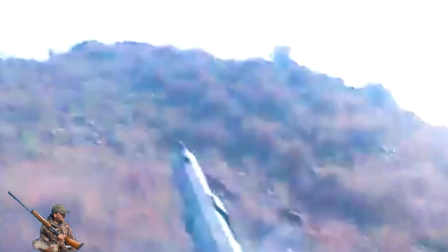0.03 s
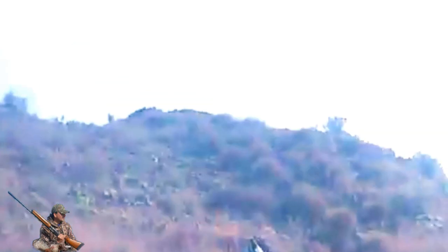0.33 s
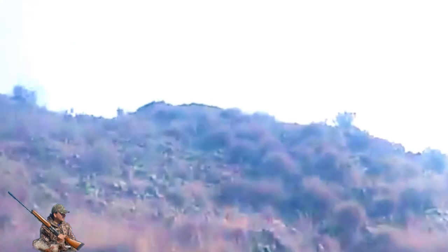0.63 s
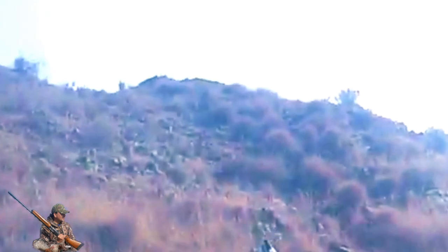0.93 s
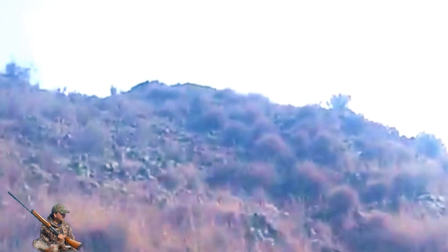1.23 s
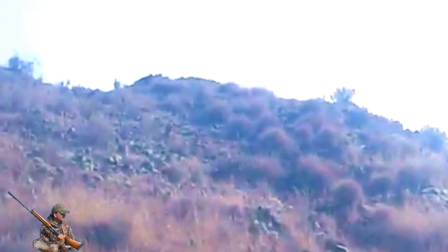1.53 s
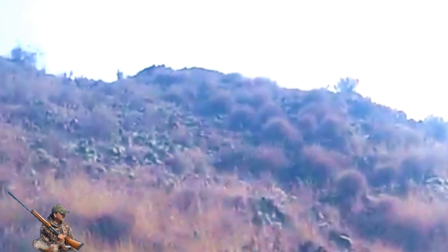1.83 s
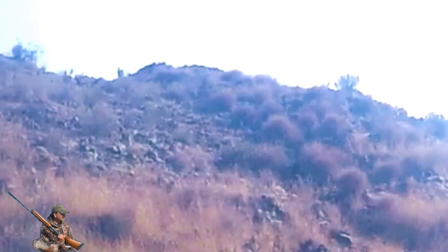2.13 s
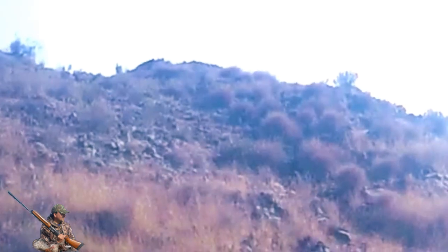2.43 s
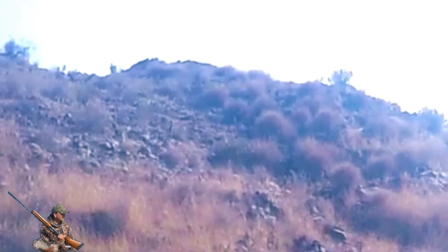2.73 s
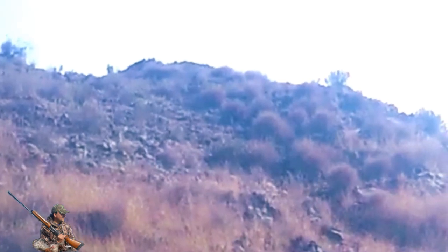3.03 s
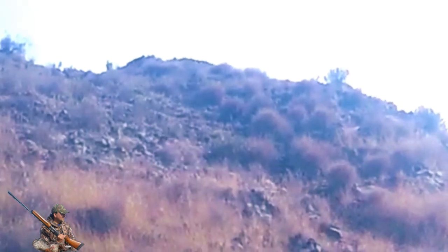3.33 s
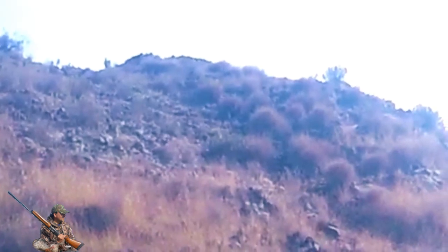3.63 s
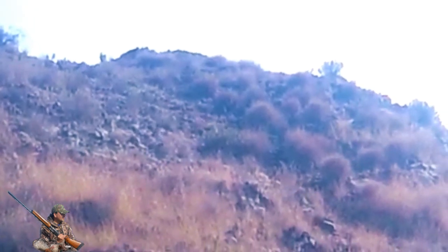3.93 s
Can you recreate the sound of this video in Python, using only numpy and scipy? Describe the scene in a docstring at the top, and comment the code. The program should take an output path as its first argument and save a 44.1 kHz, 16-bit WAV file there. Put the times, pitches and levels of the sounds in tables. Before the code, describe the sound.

A slowed-down shotgun blast booms deep and dull over a hillside, with short echoes. The gun's action clatters shut with a brief steel ring, then the rumble fades into faint wind on the microphone.

```python
"""A shotgun blast rolls over a scrubby hillside, heard in slow motion, so it is all deep and dull.
Under the roar the air pressure swings slowly, and the slopes throw back short echoes.
Half a second in, the gun's action (its moving parts) clatters shut and its steel rings.
A ridge answers last and faint wind remains. The slowed playback adds a thin whistle
that follows the wave."""
import sys
import numpy as np
from scipy import signal
from scipy.fft import rfft, irfft
from scipy.io import wavfile

SR = 44100
rng = np.random.default_rng(int(sys.argv[2]) if len(sys.argv) > 2 else 0)


def master_out(mix):
    """Clip the mix to full scale and print it as 16-bit PCM to the path in sys.argv[1]."""
    frames = np.transpose(np.atleast_2d(mix))
    ceiling = np.clip(frames, -1, 1)
    pcm = np.round(ceiling * 32767).astype(np.int16)
    wavfile.write(sys.argv[1], SR, pcm)


N = 176400
TIME = np.arange(N) / SR


def amp(db):
    """Turns decibels into a number to multiply by."""
    return 10 ** (np.asarray(db) / 20)


def unit(x):
    """Scales a signal to an average (rms) strength of 1."""
    return x / np.sqrt(np.mean(x ** 2) + 1e-30)


def at_pitch(table, hz):
    """Looks up a value between a table's rows, on a log-frequency scale."""
    row_hz, value = np.transpose(table)
    return np.interp(np.log(hz + 1), np.log(row_hz + 1), value)


def noise(tone):
    """Steady noise of strength 1; the table sets how its lows and highs balance."""
    gain = amp(at_pitch(tone, np.fft.rfftfreq(N, 1 / SR)))
    return unit(irfft(rfft(rng.standard_normal(N)) * gain, N))


def wander(hz):
    """A smooth random wobble, up to about the given rate."""
    gain = np.exp(-(np.fft.rfftfreq(N, 1 / SR) / hz) ** 2)
    return unit(irfft(rfft(rng.standard_normal(N)) * gain, N))


def strike(start_s, fade_s, rise_s=0.0022):
    """The loudness of one hit: it rises fast, then drops to 37% every fade_s."""
    age = np.maximum(TIME - start_s, 0)
    return np.minimum(age / rise_s, 1) * np.exp(-np.maximum(age - rise_s, 0) / fade_s)


def low_pass(x, hz):
    """Cuts away everything above the given frequency."""
    taps = signal.firwin(2401, hz, window=("kaiser", 9), fs=SR)
    padded = np.pad(x, len(taps) // 2, "reflect", reflect_type="odd")
    return signal.fftconvolve(padded, taps, "valid")


# tone of the roar (frequency [Hz], relative level [dB])
BLAST_TONE = [(4, -10.5), (12, -15.5), (26, 11), (45, -4), (80, -16), (125, -12.5), (180, -8.5), (220, -11),
              (285, -21), (340, -13.5), (390, -21), (458, -8.5), (495, -15.5), (540, -22.5), (590, -24),
              (730, -31.5), (900, -32), (1070, -36), (1450, -37.5), (1850, -45)]
# how fast each pitch dies; below 1 it lingers (frequency [Hz], share of the fall [ratio])
BLAST_FALL = [(10, 1.0), (30, 0.93), (150, 1), (460, 0.94), (900, 0.91), (1850, 1)]
BLAST_DB, BLAST_HOLD_S, BLAST_KNEE_S = -30.5, 0.088, 0.47
BLAST_END_S = 2.74  # the farthest slopes have answered by then


def blast():
    """The hillside scatters the shot into a lumpy roar that holds briefly, dies down and runs out."""
    hz, t, spectrum = signal.stft(noise(BLAST_TONE), SR, nperseg=2048)
    fall_db = 46.5 * np.log10(1 + np.maximum(t - BLAST_HOLD_S, 0) / BLAST_KNEE_S)  # fast, then slower
    fade = amp(-at_pitch(BLAST_FALL, hz)[:, None] * fall_db)
    run_out = 1 / (1 + (t / BLAST_END_S) ** 6)
    roar = signal.istft(spectrum * run_out * fade, SR)[1][:N]
    lumps_db = 0.47 * wander(hz=23)
    return roar * amp(BLAST_DB - lumps_db)


SWING_HZ, HEAVE_DB, HEAVE_HOLD_S, HEAVE_FADE_S = 4.7, -13.5, 0.24, 0.1
SWAY_DB, SWAY_FADE_S = -31.5, 0.78


def pressure_swing():
    """The air heaves a few times after the blast, then settles with a long, weak sway."""
    heave = amp(HEAVE_DB) * np.exp(-np.maximum(TIME - HEAVE_HOLD_S, 0) / HEAVE_FADE_S)
    sway = amp(SWAY_DB) * np.exp(-TIME / SWAY_FADE_S)
    return np.maximum(heave, sway) * np.sin(2 * np.pi * SWING_HZ * TIME)


# how the wind rises and falls (time [s], gust level [dB], rustle level [dB])
WIND_LEVELS = [(0, -77, -94), (1.7, -78, -84.5), (2.3, -74.5, -78), (2.5, -70.5, -82), (2.75, -72.5, -90.5),
               (3.048, -72, -94), (3.4, -74, -90.5), (3.799, -74.5, -91.5), (4, -70.5, -88)]
# tones of the gusts and of the grass (frequency [Hz], relative level [dB])
GUST_TONE = [(5, 0.5), (12, -6), (25, -3), (45, -5.5), (85, -16.5), (130, -12), (180, -9.5), (270, -12.5),
             (350, -16), (460, -10), (600, -23), (800, -29.5), (1850, -53)]
RUSTLE_TONE = [(100, -3.5), (500, -1), (750, 2.5), (1100, 0), (1550, -2.5), (1850, -12)]


def wind():
    """Low gusts blow on the microphone and dry grass rustles faintly."""
    times, gust_db, rustle_db = np.transpose(WIND_LEVELS)
    gusts = noise(GUST_TONE) * amp(np.interp(TIME, times, gust_db))
    flutter = amp(0.64 * wander(hz=35))
    rustle = noise(RUSTLE_TONE) * amp(np.interp(TIME, times, rustle_db))
    drift = amp(-58.5) * wander(hz=11)  # air slowly pressing on the microphone
    return gusts * flutter + rustle + drift


# echoes of the shot (time [s], dull part's level [dB], bright part's level [dB])
SLAPS = [(0.076, -55, -51.5), (0.253, -45, -52.5), (0.382, -44, -55), (.472, -39, -67), (0.922, -57, -70),
         (1.071, -57, -68), (1.107, -64, -76), (1.207, -61.5, -74), (1.406, -63, -69.5)]
# tones of the two parts (frequency [Hz], relative level [dB])
DULL_TONE = [(100, -12), (300, -6), (480, 6), (600, -6.5), (750, -20), (1850, -44.5)]
BRIGHT_TONE = [(300, -12), (650, 3), (950, -1.5), (1850, -16)]
SLAP_FADE_S = 0.012


def slope_echoes():
    """The slope throws back single slaps that stand out of the roar."""
    dull = sum(amp(db) * strike(start, SLAP_FADE_S) for start, db, _ in SLAPS)
    bright = sum(amp(db) * strike(start, SLAP_FADE_S) for start, _, db in SLAPS)
    return noise(DULL_TONE) * dull + noise(BRIGHT_TONE) * bright


# the gun closing (time [s], thud level [dB], relative clatter level [dB], thud fade [s])
ACTION_KNOCKS = [(.513, -51, -46.5, 0.0088), (0.523, -32, -41, 0.016), (.544, -43, -44, .014),
                 (0.558, -30.5, -41.5, 0.015), (.572, -39.5, -47, 0.015), (0.593, -42.5, -56, .016),
                 (.637, -41, -50.5, 0.011)]
# tones of the stock and of the loose parts (frequency [Hz], relative level [dB])
THUD_TONE = [(60, -17.5), (140, -2), (175, -7), (220, -3), (270, -10), (340, 1.5), (400, 0), (470, 1.5),
             (600, -6.5), (770, -16.5), (1100, -22.5), (1880, -31)]
CLATTER_TONE = [(300, -12.5), (680, -4.5), (780, -9.5), (950, 3.5), (1120, -0.5), (1200, -7), (1500, -10),
                (1880, -13)]
CLATTER_DB = -4


def action_knocks():
    """Each knock of the closing action thuds in the gun's stock and rattles loose parts."""
    thuds = sum(amp(db) * strike(start, fade_s) for start, db, _, fade_s in ACTION_KNOCKS)
    clatter = sum(amp(db) * strike(start, fade_s=0.025) for start, _, db, _ in ACTION_KNOCKS)
    return noise(THUD_TONE) * thuds + amp(CLATTER_DB) * noise(CLATTER_TONE) * clatter


def hillside_reverb(knocks, level_db=-12, die_away_s=0.78):
    """The hillside answers the knocks with a wash of sound that drops 60 dB in die_away_s."""
    tail = rng.standard_normal(SR) * amp(-60 * TIME[:SR] / die_away_s)
    return amp(level_db) * signal.fftconvolve(knocks, tail / np.linalg.norm(tail))[:N]


# the notes the steel rings with (frequency [Hz], level [dB], time to drop 60 dB [s])
STEEL_NOTES = [(708, -55.5, 0.45), (871, -57.5, 0.25), (936, -54, 0.4), (1023, -55, 0.12),
               (1120, -49.5, 0.4), (1492, -59.5, 0.69), (1606, -67, 0.8), (1810, -60, 0.77),
               (1980, -53.5, 0.35)]


def steel_ring(start_s=0.559):
    """The bolt slams home and sets the steel ringing; each note fades at its own pace."""
    age = np.maximum(TIME - start_s, 0)
    return sum(amp(db - 60 * age / ring_s) * np.sin(2 * np.pi * hz * age)
               for hz, db, ring_s in STEEL_NOTES)


# tone of the ridge's late echo (frequency [Hz], relative level [dB])
RIDGE_TONE = [(20, -1), (50, 0), (90, -13.5), (130, -10.5), (180, -0.5), (280, -9), (370, -12), (470, -4.5),
              (560, -20), (750, -30), (1850, -53.5)]


def ridge_echo(peak_s=2.733, width_s=0.22, peak_db=-65.5):
    """The ridge sends the shot back last, as a soft swell."""
    swell = np.exp(-((TIME - peak_s) / width_s) ** 2)
    return amp(peak_db) * swell * noise(RIDGE_TONE)


def scene():
    """The shot, the closing gun and the wind meet at one microphone."""
    shot = blast() + pressure_swing() + slope_echoes() + ridge_echo()
    knocks = action_knocks()
    gun = knocks + hillside_reverb(knocks) + steel_ring()
    return (shot + gun + wind())[None]


SLOWED_RATE_HZ = 5512.5  # samples per second once slowed down
WHISTLE_DB, OCTAVE_DB, HISS_DB = -58, -66, -99.5


def record(dry):
    """Slowed playback loses the highs and adds hiss and a whistle: faint, high copies of the sound."""
    dull = low_pass(dry[0], hz=1915)
    phase = 2 * np.pi * SLOWED_RATE_HZ * TIME
    whistle = dull * (amp(WHISTLE_DB) * np.cos(phase) + amp(OCTAVE_DB) * np.cos(2 * phase))
    hiss = amp(HISS_DB) * rng.standard_normal(N)
    return low_pass(dull + whistle + hiss, hz=15800)[None]


dry = scene()
out = record(dry)
master_out(out)
```